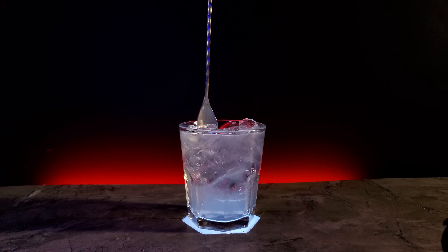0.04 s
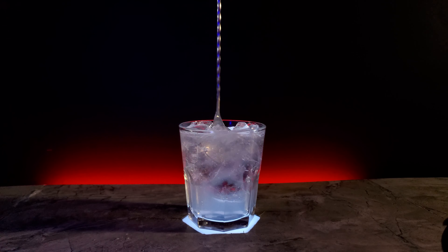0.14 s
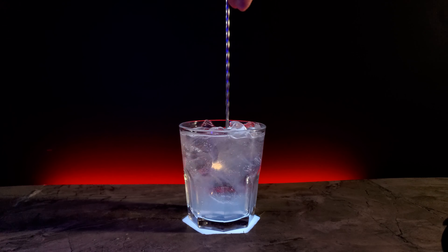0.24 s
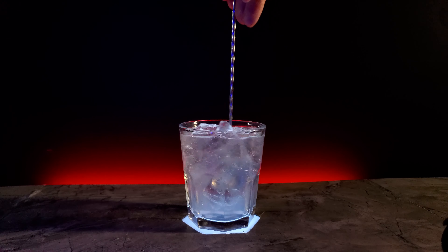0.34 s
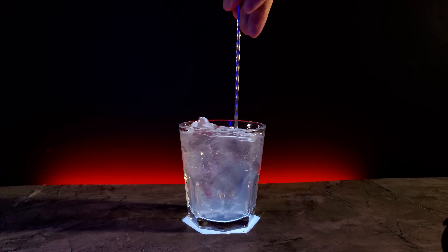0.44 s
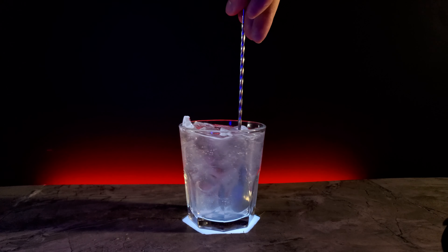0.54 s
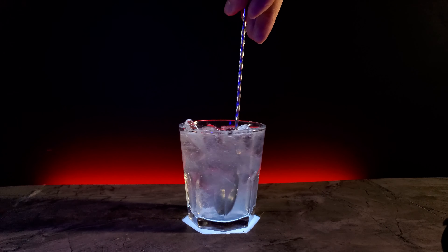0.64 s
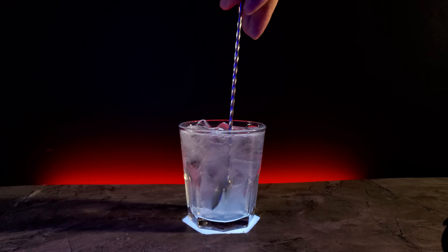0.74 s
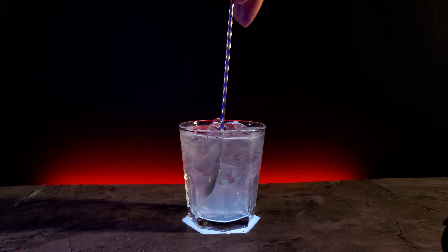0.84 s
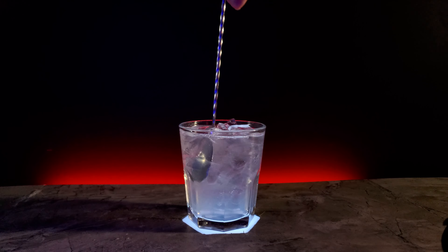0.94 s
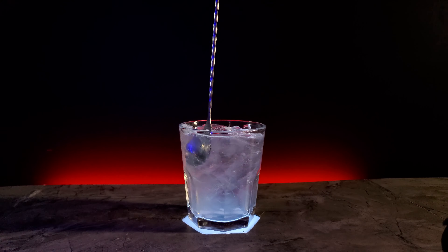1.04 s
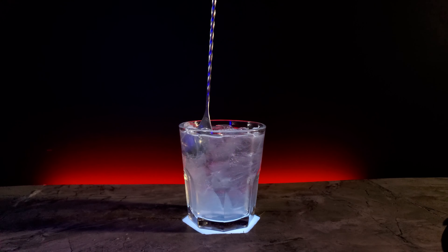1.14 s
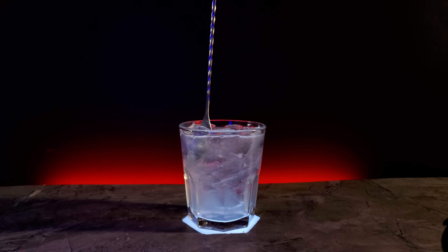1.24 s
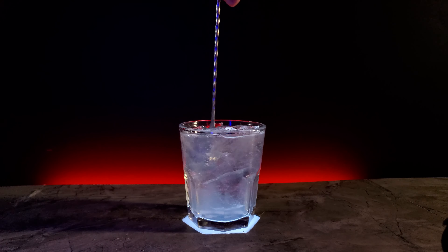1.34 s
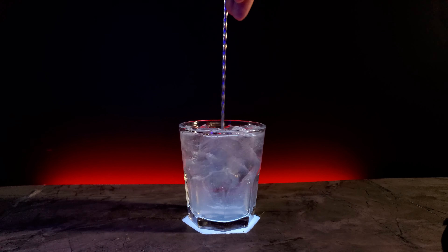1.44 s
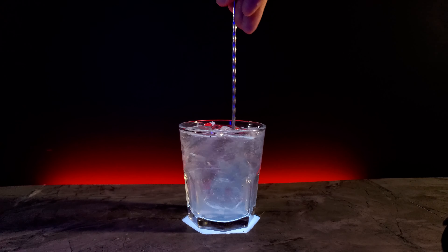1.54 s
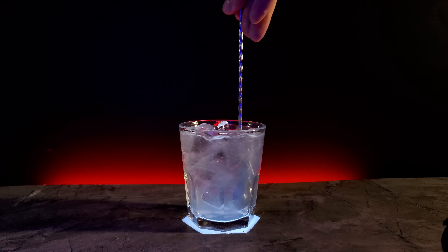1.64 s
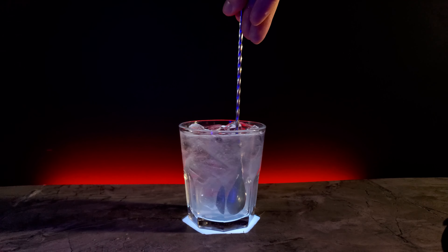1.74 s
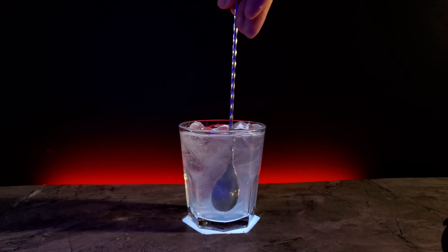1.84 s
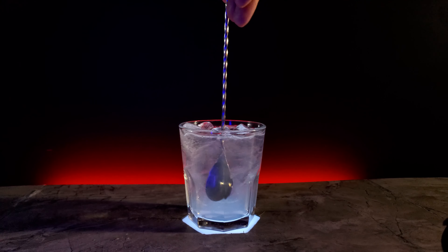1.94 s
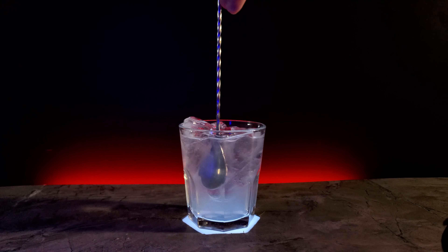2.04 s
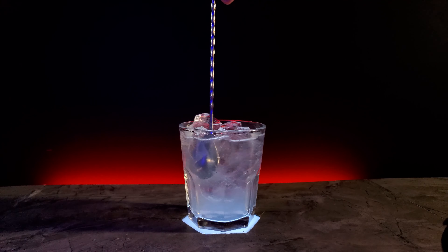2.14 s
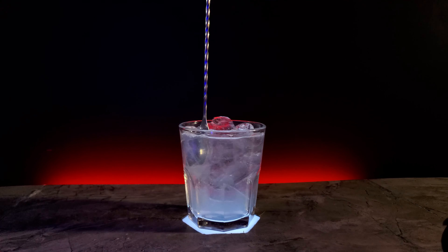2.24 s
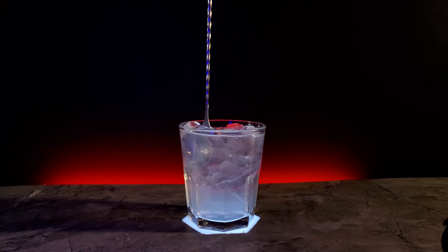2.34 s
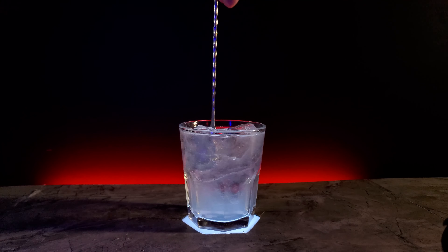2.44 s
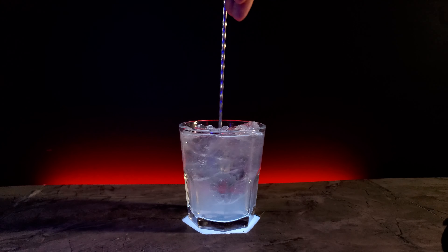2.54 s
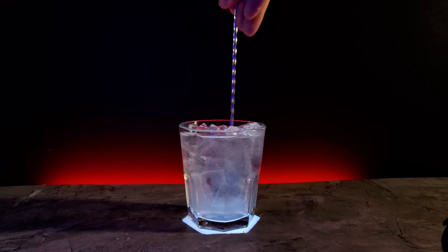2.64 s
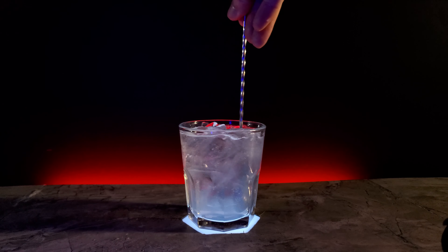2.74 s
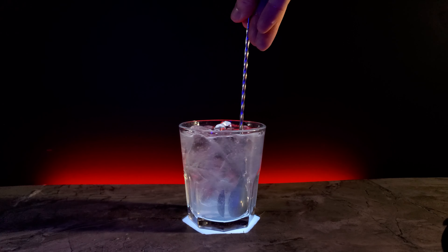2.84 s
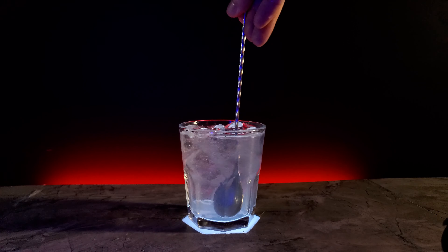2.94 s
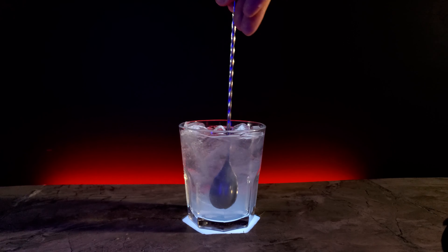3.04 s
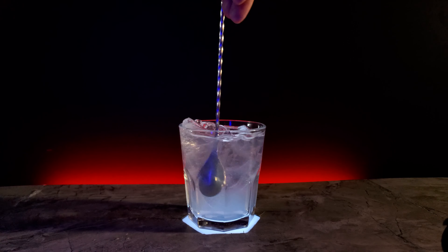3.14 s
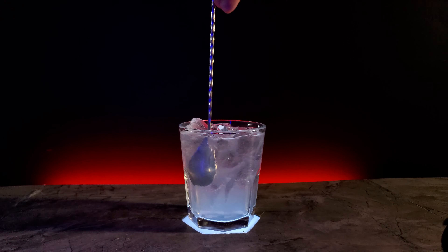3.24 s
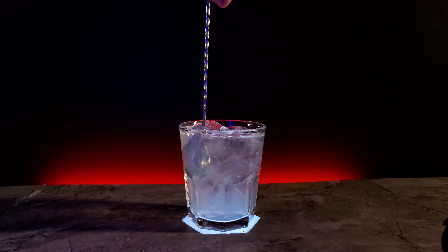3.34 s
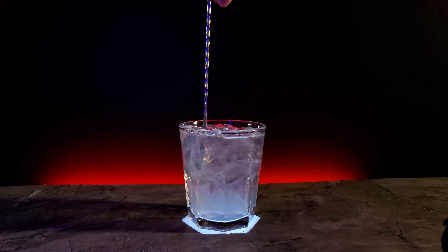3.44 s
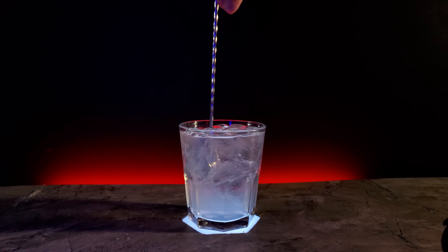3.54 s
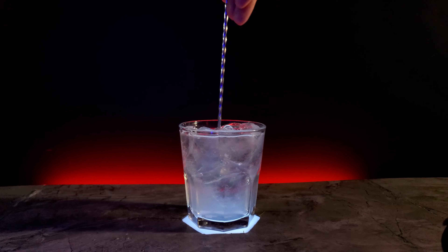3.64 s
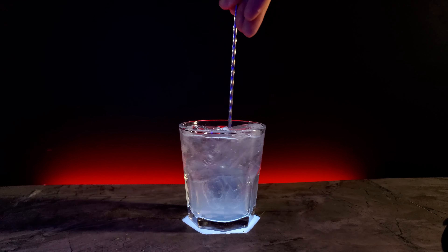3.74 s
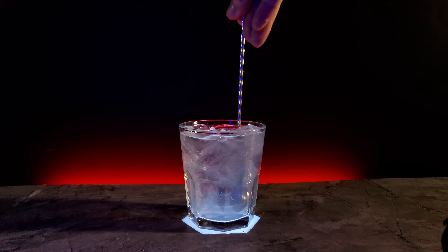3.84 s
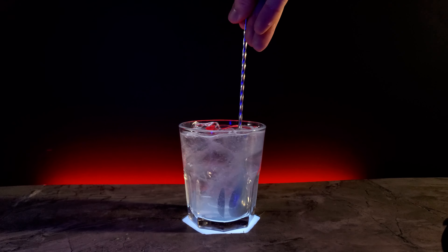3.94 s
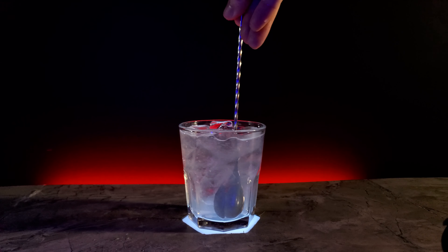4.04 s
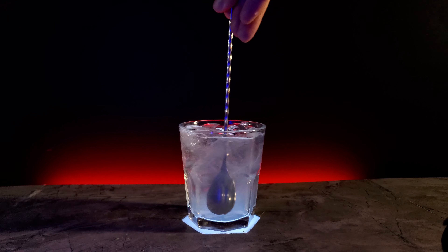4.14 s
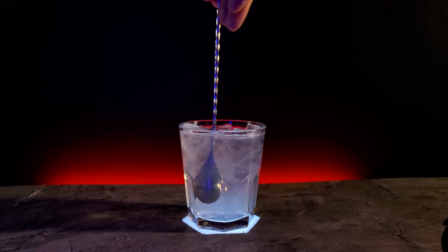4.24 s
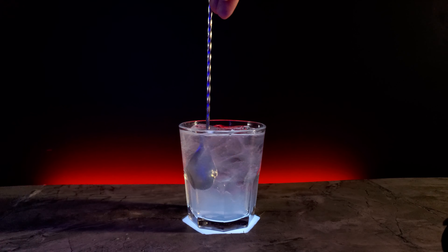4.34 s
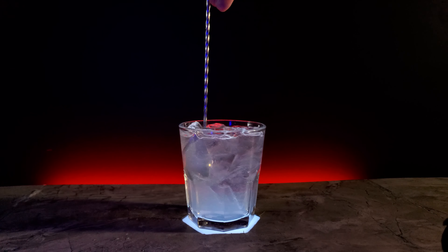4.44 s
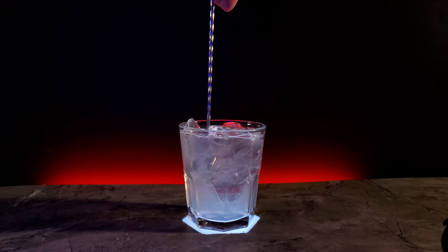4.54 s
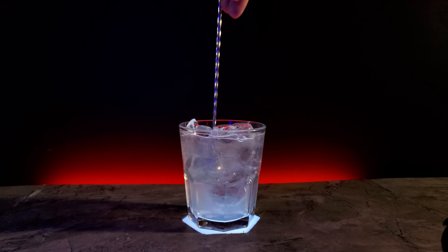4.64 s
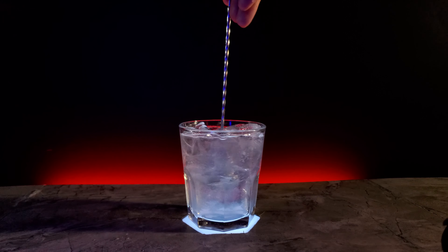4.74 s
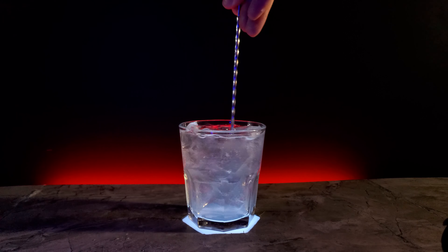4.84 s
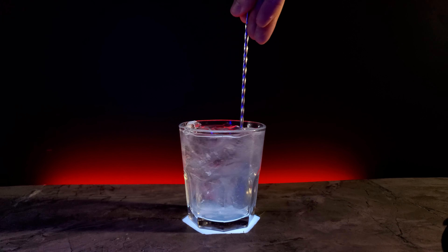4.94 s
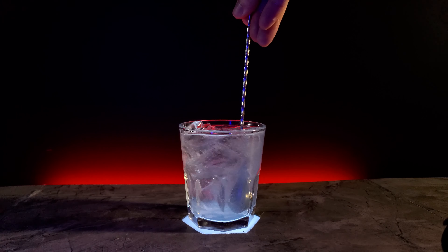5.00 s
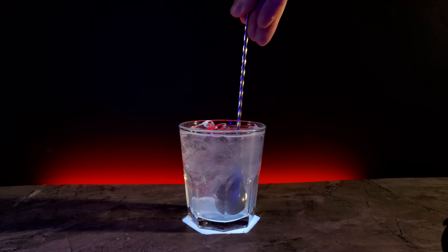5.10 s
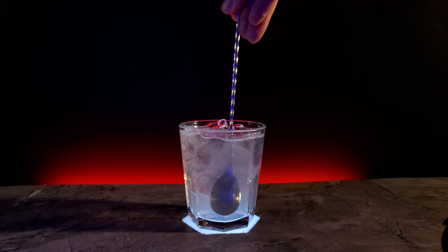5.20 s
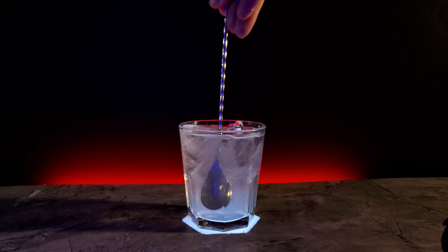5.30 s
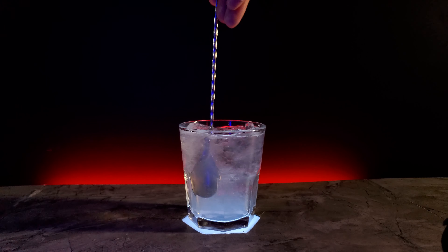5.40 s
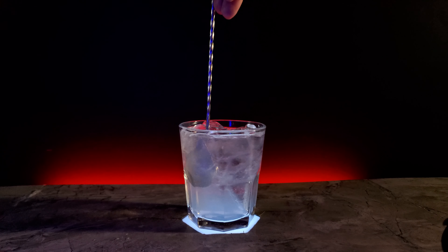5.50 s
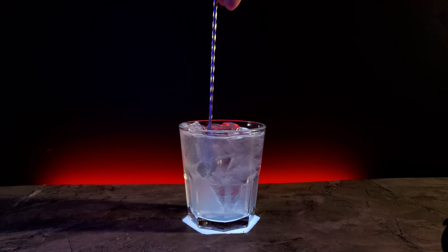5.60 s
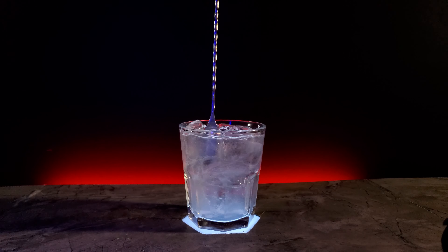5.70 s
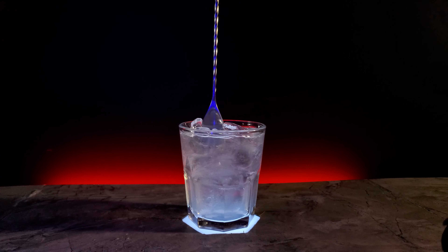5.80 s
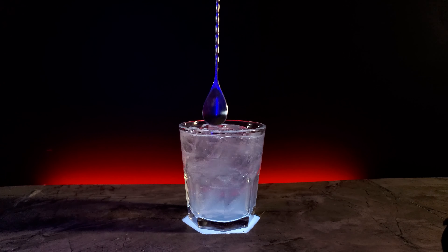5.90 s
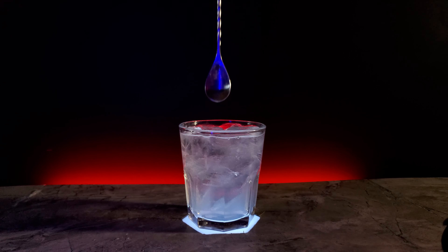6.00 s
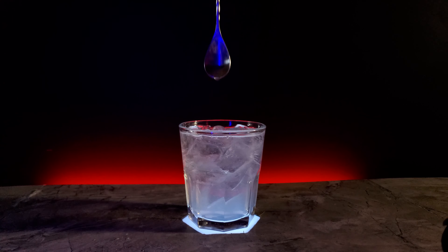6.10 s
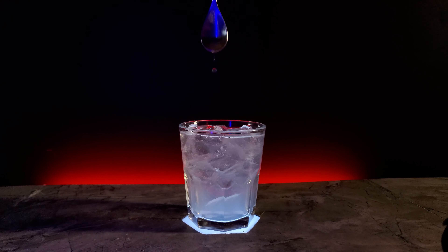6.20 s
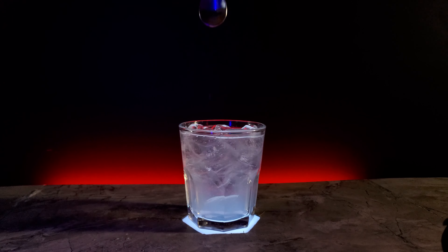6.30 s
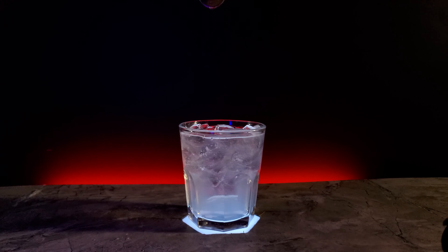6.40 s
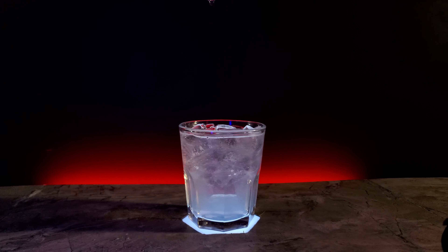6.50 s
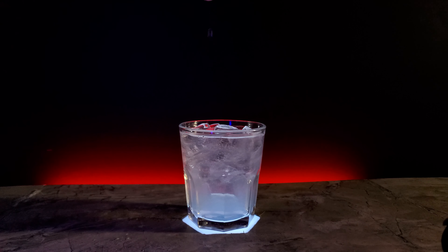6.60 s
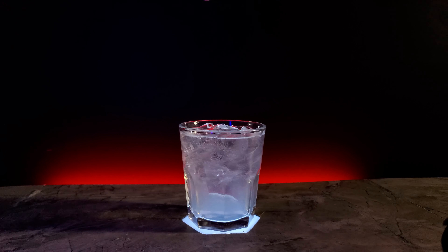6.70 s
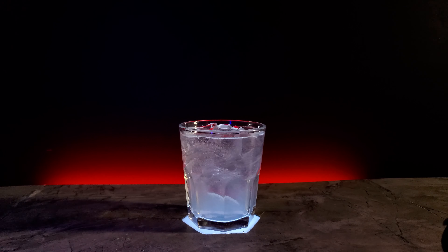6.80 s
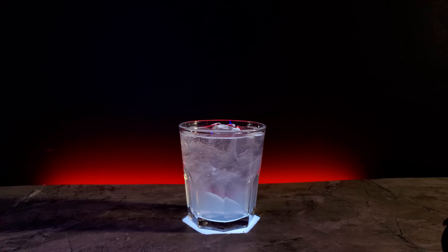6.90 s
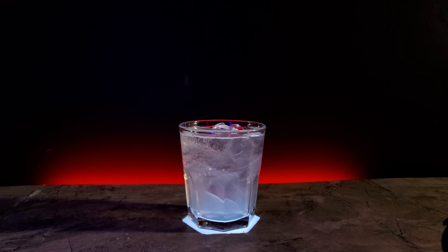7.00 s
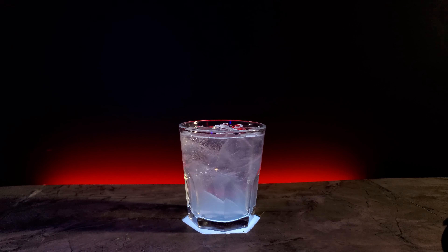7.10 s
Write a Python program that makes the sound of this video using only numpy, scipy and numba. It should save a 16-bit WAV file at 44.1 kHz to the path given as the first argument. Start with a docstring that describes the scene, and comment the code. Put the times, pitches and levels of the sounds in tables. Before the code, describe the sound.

Close-up of ice being stirred in a full glass: a bright opening burst of knocks, busy wet clinks and rattles, then settling into stillness.

```python
"""A quick clatter of knocks and watery plops opens: a long spoon drops into a thick tumbler of ice and water,
stirs it round and is lifted out, close to a stereo microphone. Contacts of cubes and spoon are impulses and
gritty noise that crack, then excite fading resonators for the wet glass; cube and spoon ring as decaying sines.
Air pockets are gliding sines, the table thuds as low noise, and a small quiet room answers over still air."""
import sys
import numpy as np
from scipy import signal
from scipy.fft import rfft, irfft
from scipy.io import wavfile
from scipy.ndimage import uniform_filter1d
from numba import njit

SR = 44100
rng = np.random.default_rng(int(sys.argv[2]) if len(sys.argv) > 2 else 0)


def voltage_ratio(decibels):
    """Convert decibels (scalar or array-like) to amplitude ratios, 20 dB per decade."""
    exponent = np.asarray(decibels, float) / 20
    return 10 ** exponent


def generate_wav(signal):
    """Clip the signal to [-1, 1] and save it as 16-bit WAV at the path in sys.argv[1]."""
    frames = np.transpose(np.atleast_2d(signal))
    scaled = np.clip(frames, -1, 1) * 32767
    pcm = np.round(scaled).astype(np.int16)
    wavfile.write(sys.argv[1], SR, pcm)


N = 315577


def knocks():
    """Impact spectrum: a knock with much body is dull and low, one with little is bright; each varies a little."""
    # clear knocks: t/s, strength level/dB, body (low ring against the whole)/dB
    knock_table = [(0.0381, -3.5, -10.5), (0.0506, 2.5, -17), (0.0666, 1, -14.5), (0.0942, -2, -15.5),
                   (0.1238, -12, -9), (0.171, -15, -21), (0.1885, -20, -14), (0.2094, -3.5, -19.5),
                   (0.2438, -18, -3.5), (0.2807, 1, -18.5), (0.3227, -6, -11), (0.3419, -9.5, -6),
                   (0.364, -16, -17), (0.4007, -22, -33), (0.4232, -18, -13), (0.4437, -22, -9),
                   (0.4574, -15, -10), (0.5823, -21, -6.5), (0.6233, -18, -16), (0.6802, -15.5, -9.5),
                   (0.7163, -19.5, -5.5), (0.7443, -31, -10), (0.8886, -27, -13), (0.915, -19.5, -11.5),
                   (0.9304, -17, -13.5), (0.9454, -14, -16.5), (1.0058, -18, -13), (1.0161, -13, -8),
                   (1.0303, -8.5, -18), (1.1037, -17.5, -29), (1.1526, -13, -14.5), (1.1737, -15.5, -23),
                   (1.2283, -22, -9), (1.2473, -6.5, -20.5), (1.2945, -39, -23), (1.3371, -3, -10),
                   (1.37, -16.5, -16.5), (1.4194, -21, -15), (1.4378, -19, -24), (1.4643, -25, -15),
                   (1.494, -21, -11), (1.506, -14, -13), (1.575, -23.5, -3), (1.6365, -21, -7.5),
                   (1.6919, -12, -12), (1.718, -3.5, -16.5), (1.7778, -22, -6), (1.8198, -51, -21),
                   (1.8397, -19.5, -17), (1.867, -19, -7.5), (1.9016, -18.5, -7.5), (1.9376, -15, -16),
                   (1.9748, -23.5, -4.5), (2.008, -20, -9.5), (2.0517, -21.5, -13), (2.0812, -16.5, -8.5),
                   (2.1082, -14, -9), (2.147, -17, -11), (2.164, -16.5, -20), (2.2476, -19.5, -9),
                   (2.3146, -15, -24.5), (2.3302, -20.5, -22), (2.3989, -28, -2), (2.4683, -38, -8),
                   (2.4847, -19, -9.5), (2.535, -14.5, -11), (2.59, -36, -17), (2.603, -13.5, -19.5),
                   (2.6551, -14, -9.5), (2.6889, -8.5, -19), (2.7307, -23.5, -5), (2.7416, -17.5, -7.5),
                   (2.7544, -9, -10), (2.7821, -21.5, -7), (2.81, -19, -18), (2.82, -19, -10),
                   (2.8499, -1.5, -17), (2.8986, -24, -22), (2.962, -23, -6.5), (2.9879, -16.5, -13.5),
                   (3.0098, -22, -18.5), (3.0625, -17, -17), (3.0822, -18, -8.5), (3.1115, -15.5, -11),
                   (3.1505, -18.5, -18), (3.1791, -19.5, -14), (3.2111, -15, -17), (3.2627, -12, -11.5),
                   (3.2848, -20, -10), (3.3218, -17, -16.5), (3.342, -22, -11), (3.3634, -12.5, -25),
                   (3.3855, -31, -10), (3.4031, -7.5, -14), (3.4577, -13, -20), (3.4957, -12.5, -29.5),
                   (3.6146, -24.5, -31), (3.662, -29.5, -6), (3.7591, -24, -11.5), (3.7866, -15, -7.5),
                   (3.8137, -19.5, -12.5), (3.8376, -16.5, -6), (3.9469, -29, -3.5), (3.9812, -15.5, -8),
                   (3.9973, -11.5, -15.5), (4.0706, -18.5, -23), (4.0837, -5, -16), (4.1006, -23, -6),
                   (4.116, -15, -12), (4.1392, -15, -16), (4.1597, -17, -11.5), (4.1888, -14.5, -11.5),
                   (4.22, -19, -15.5), (4.2482, -19, -9), (4.2989, -17.5, -11), (4.347, -28, -4),
                   (4.4366, -15, -15.5), (4.4817, -17, -19), (4.5722, -31, -18), (4.6127, -29.5, -4),
                   (4.6491, -20.5, -4.5), (4.7104, -12, -13), (4.7601, -18.5, -7), (4.779, -5, -8.5),
                   (4.8055, -7, -13), (4.8158, -8, -13.5), (4.8585, -17.5, -3.5), (4.8966, -11, -9.5),
                   (4.9822, 2, -17.5), (5.004, -15.5, -13), (5.0918, -24, -7), (5.1682, -24, -2),
                   (5.1898, -21, -3), (5.2016, -16.5, -9), (5.2372, -25.5, -3), (5.2812, -18.5, -19.5),
                   (5.3425, -19.5, -9), (5.3739, -7, -15.5), (5.4791, -15.5, -13.5), (5.4852, -27, -14),
                   (5.5132, -13, -21.5), (5.527, -18.5, -14.5), (5.5453, -24, -14), (5.5584, -15.5, -9.5),
                   (5.5686, -19, -16.5), (5.615, -8.5, -8), (5.6875, -30, -9), (5.7489, -4.5, -13.5),
                   (5.7765, -15, -12), (5.7977, -16, -10.5), (5.8327, -8, -14), (5.8627, -24, -15),
                   (5.874, -15.5, -17), (5.9494, -12.5, -13), (5.9627, -16, -11.5), (5.9759, -12, -20),
                   (6.0701, -24, -8), (6.0834, -24.5, -8.5), (6.117, -31, -17), (6.1993, -43, -20),
                   (6.2365, -33, -16), (6.2546, -22.5, -7), (6.3342, -28.5, -8), (6.4432, -35, -7),
                   (6.547, -50, -23), (6.649, -37.5, -8.5), (7.078, -46.5, -36)]
    # a middling knock, one level/dB for each band
    middling_band_db = [-9.5, -7, -6.5, -8.5]
    # change of each band per dB of body above a middling knock, dB/dB
    body_share = [0.99, 0.59, -0.56, -0.85]
    middling_body_db = -12.5
    s, strength_db, body_db = np.transpose(knock_table)[:, :, None]
    body_db = np.clip(body_db - middling_body_db, -13, 9)
    chance = rng.standard_normal((len(s), 5))
    band_db = strength_db + middling_band_db + body_db * body_share + 0.94 * chance[:, :4]
    cube_hz = 4000 * 2 ** (-0.11 * body_db[:, 0] + 0.26 * chance[:, 4])
    return s[:, 0], band_db, np.clip(cube_hz, 1200, 12000)


def drift(count, size):
    """Moving average of white noise: unrelated walks of spread 1, one value per 64 samples, smooth over size."""
    return np.sqrt(size) * uniform_filter1d(rng.standard_normal((count, N // 64 + 1)), size)


def jostle(level_db, count=3400):
    """Random point process: cubes bump each other and the wall hundreds of times a second, mostly softly."""
    # small knocks, one level/dB for each band
    small_band_db = [-7.5, -9.5, -6.5, -8]
    plunge_s = 0.031
    s = rng.uniform(plunge_s, N / SR, count)
    chance = rng.standard_normal((count, 6))
    # louder bumps come in bunches
    level_db = level_db + 2.6 * np.repeat(drift(count=1, size=16)[0], 64)[:N]
    size_db = level_db[(s * SR).astype(int)] + 7.37 * np.clip(chance[:, 0], -3, 1.25) + 3.5
    band_db = size_db[:, None] + np.array(small_band_db) + 2.4 * np.clip(chance[:, 1:5], -3, 1.5)
    cube_hz = 4200 * 2 ** (0.4 * chance[:, 5])
    return s, band_db, np.clip(cube_hz, 1200, 12000)


def taps(s, band_db):
    """Impulsive excitation: one impulse per contact in each band."""
    return np.array([np.bincount((s * SR).astype(int), voltage_ratio(db), N) for db in band_db.T])


def fade(x, tau):
    """Exponential relaxation: every impulse dies away with time constant tau in seconds."""
    return signal.lfilter([1], [1, -np.exp(-1 / (tau * SR))], x)


def push(impulses, rise_s, crunch_s, skid_s, skid_db):
    """Contact force envelope: the grit rises quickly, crunches, and leaves a longer weaker skid."""
    # the skid weakens by 2 dB from band to band upward
    skid_gain = voltage_ratio(skid_db - 2 * np.arange(len(impulses))[:, None])
    force = fade(impulses, crunch_s) + skid_gain * fade(impulses, skid_s)
    return fade(force, rise_s) / (1 + rise_s * SR)


def stereo(x, alike):
    """Interchannel coherence: two unrelated signals give left and right; alike is the share in common."""
    alike = np.clip(alike, 0, 1)
    return np.sqrt(alike) * x[0] + np.sqrt(1 - alike) * x[1] * np.array([[1], [-1]])


@njit
def modes(x, hz, t60, gain, wander, sr):
    """Modal synthesis: x strikes fading resonators whose pitch follows wander, decay t60 and drive gain."""
    out = np.zeros(x.shape)
    for k in range(len(hz)):
        for c in range(2):
            z, p = 0j, 0j
            for i in range(x.shape[1]):
                if i % 64 == 0:
                    turn = 2j * np.pi * hz[k] * wander[k, i // 64] / sr
                    loss = np.log(1000) / (t60[k, i // 64] * sr)
                    p = np.exp(turn - loss)
                z = z * p + gain[k, i // 64] * x[c, i] + 1e-18
                out[c, i] += z.imag
    return out


def glass(blow, strength, ring_db, table_db):
    """Forced and free vibration: contact grit is heard bare; grit and clean blows ring the wall's modes."""
    # modes of the water-filled glass before they wander: f/Hz, level/dB, t60/s
    glass_modes = [(367.3, -13.5, 0.033), (645, -7, 0.02), (1492, -9, 0.086), (1558, 4, 0.041),
                   (1695, 3.5, 0.011), (3020, 1, 0.031), (5218, 13.5, 0.003), (5805, 2.5, 0.0051),
                   (9140, 4.5, 0.0037), (10360, 6, 0.0025)]
    # limits of the four contact bands: f/Hz
    band_limits = [1000, 2200, 3800, 7200, 13500]
    # the bare contact beside the ring, one level/dB for each band
    crack_db = [-38.5, 2.5, -6, -3.5]
    # share common to both sides, one for each band
    band_alike = [0.99, 0.94, 0.96, 0.73]
    hz, db, t60 = np.transpose(glass_modes)
    low = hz < band_limits[0]
    t = np.arange(N // 64 + 1) * 64 / SR

    # ice leaning on the wall pulls every mode about and now damps it, now lets it ring
    wander = 1 + np.where(low, 0.1, 0.021)[:, None] * drift(len(hz), size=16)
    # with the spoon out the ice settles and the wall rings longer: e-folds of decay time gained
    lift_s, settle_s, freed = 6.1, 0.25, 0.55
    freedom = freed * np.clip((t - lift_s) / settle_s, 0, 1)
    t60 = t60[:, None] * np.exp(0.27 * drift(len(hz), size=40) + freedom)
    # air carried down by the plunge flattens and weakens the ring, then clears
    froth_sag, froth_db, froth_s = 0.045, -4.5, 0.76
    froth = np.exp(-(t / froth_s) ** 2)
    wander = wander - froth_sag * froth
    # the spot that is hit moves round, favouring other modes
    gain = voltage_ratio(db[:, None] + ring_db + froth_db * froth + 3.6 * drift(len(hz), size=12))
    # the lowest modes speak when the glass presses on the table: dB per dB of table level
    thump_db, thump_follows = 52.5, 0.52
    gain[low] *= voltage_ratio(thump_follows * (table_db[::64] + thump_db))

    grit = rng.standard_normal((2, N))
    out = 0
    for k, (lo, hi) in enumerate(zip(band_limits, band_limits[1:])):
        force = stereo(grit * strength[k], band_alike[k])
        band = signal.butter(3, [lo, hi], "band", fs=SR, output="sos")
        crack = signal.sosfilt(band, force) * np.sqrt(SR / 2 / (hi - lo))
        # each blow lands a little to one side or the other
        force = force + stereo(blow[k] * np.sign(grit), band_alike[k])
        out = out + voltage_ratio(crack_db[k]) * crack
        groups = [(hz >= lo) & (hz < hi)]
        if k == 0:  # the lowest band also drives the modes below it
            groups.append(low)
        for mine in groups:
            ring = modes(force, hz[mine], t60[mine], gain[mine], wander[mine], SR)
            # a mode sheds little sound far below its own pitch
            radiation = signal.butter(3, 0.63 * hz[mine].min(), "high", fs=SR, output="sos")
            out = out + signal.sosfilt(radiation, ring)
    # the highest treble of the glass falls away gently
    out = signal.sosfilt(signal.butter(3, 12600, fs=SR, output="sos"), out)
    # the small wall moves little air at the lowest frequencies
    return signal.sosfilt(signal.butter(3, 420, "high", fs=SR, output="sos"), out)


def cubes(s, band_db, hz):
    """Free vibration: every contact rings the cube briefly, at a pitch of its own and from its own side."""
    ring_db, cycles = -12.5, 56  # level beside the contact; cycles to fade 60 dB, before the closing taper
    t = np.arange(512) / SR
    level_db = band_db.max(axis=1)[:, None] + ring_db - 60 * t * hz[:, None] / cycles
    ring = voltage_ratio(level_db) * np.sin(2 * np.pi * hz[:, None] * t)
    # soft onset, and a taper to silence
    ring = ring * (1 - np.exp(-t / 0.00053)) * np.cos(np.pi / 2 * t / t[-1])
    at = ((s * SR).astype(int)[:, None] + np.arange(len(t))).ravel()
    pan_db = 2.0 * rng.standard_normal((len(s), 1))
    sides = [(ring * voltage_ratio(side * pan_db)).ravel() for side in (-1, 1)]
    return np.array([np.bincount(at, x, N + len(t))[:N] for x in sides])


def spoon():
    """Selective modal excitation: a clink rings the bowl, most in modes near the pitch its spot favours."""
    # modes of the spoon's bowl: f/Hz, level/dB, t60/s
    bowl_modes = [(2840, -8.5, 0.057), (4230, 0, 0.066), (4700, -3, 0.055), (5260, 5.5, 0.023)]
    # clinks on the wall: t/s, level/dB, favoured f/Hz
    clinks = [(0.2126, -21, 5300), (1.7181, -20, 5020), (2.8498, -14.5, 5030), (4.984, -11, 3450)]
    favour_db_per_octave = 29.5
    t = np.arange(int(0.15 * SR)) / SR
    out = np.zeros(N)
    hz, mode_db, t60 = np.transpose(bowl_modes)[:, :, None]
    for s, db, spot_hz in clinks:
        own_db = -favour_db_per_octave * np.abs(np.log2(hz / spot_hz))
        ring = voltage_ratio(db + mode_db + own_db - 60 * t / t60) * np.sin(2 * np.pi * hz * t)
        start = int(s * SR)
        out[start:start + len(t)] += ring.sum(axis=0)
    return out


def plops():
    """Bubble resonance: each air pocket rings as a decaying sine and slides in pitch."""
    # pockets squeezed between the cubes as the spoon goes in:
    # t/s, starting f/Hz, level/dB, t60/s, starting rise/(octave/s)
    pockets = [(0.034, 366, -31, 0.16, -1.5), (.095, 840, -23.5, 0.11, -0.5),
               (.125, 910, -23.5, 0.034, -20), (.158, 944, -31, 0.3, -1.5), (.255, 847, -29, 0.15, -3),
               (.318, 1073, -27, 0.19, 13.5)]
    s, hz, db, t60, rise = np.transpose(pockets)[:, :, None]
    t = np.clip(np.arange(SR) / SR - s, 0, t60)
    envelope = voltage_ratio(db - 60 * t / t60) * (1 - np.exp(-t / 0.00072))
    cycles = hz * t * (1 + np.log(2) * rise * t / 2)
    x = envelope * np.sin(2 * np.pi * cycles)
    return np.pad((x * (t < t60)).sum(axis=0), (0, N - SR))


def shoves(jostle_db):
    """Addition of powers: table level in dB, a swell per shove over a rumble that follows the stirring."""
    # shoves of the glass against the table: t/s, level/dB, length/s (from the peak to 1/e of its power)
    shove_table = [(0.094, -43.5, 0.054), (0.31, -50.5, 0.047), (0.484, -51.5, 0.019), (1.041, -46.5, 0.02),
                   (1.72, -46, 0.076), (2.746, -46, 0.13), (3.864, -43, 0.084), (4.824, -50, 0.023),
                   (4.97, -41.5, 0.054)]
    rumble_db, rumble_follows = -44.5, 0.28  # level at 0 dB of jostle; dB gained per dB of jostle
    t = np.arange(N) / SR
    power = sum(voltage_ratio(db) ** 2 * np.exp(-((t - s) / length) ** 2) for s, db, length in shove_table)
    return 10 * np.log10(power + voltage_ratio(rumble_db + rumble_follows * jostle_db) ** 2)


def coloured(points, alike):
    """Spectral shaping: stereo noise of rms 1 through the relative spectrum f/Hz, level/dB."""
    hz, db = np.transpose(points)
    bin_hz = np.arange(1, N // 2 + 2) * SR / N
    gain = voltage_ratio(np.interp(np.log(bin_hz), np.log(hz), db))
    noise = irfft(rfft(rng.standard_normal((2, N))) * gain, N)
    x = stereo(noise, alike)
    return x / x.std()


def thud(level_db):
    """Low plate resonance: the table top rumbles at its low mode, in jolts, as the glass is pushed about."""
    jolt = uniform_filter1d(drift(count=1, size=24), size=12)[0]
    jolt_db = 3.2 * np.repeat(jolt, 64)[:N]
    # relative spectrum: f/Hz, level/dB
    spectrum = [(25, -37.0), (45, 1.0), (72, 5.0), (105, 1), (160, -14.0), (600, -24.5), (1100, -43)]
    return voltage_ratio(level_db + jolt_db) * coloured(spectrum, alike=0.75)


def room(x, t60, wet_db):
    """Diffuse reverberation: a short, dull, exponentially fading tail, different at each side."""
    t = np.arange(int(0.4 * SR)) / SR
    tail = rng.standard_normal((2, len(t))) * voltage_ratio(-60 * t / t60) * (t > 0.003)
    tail = signal.sosfilt(signal.butter(1, 4500, fs=SR, output="sos"), tail)
    tail = tail / np.sqrt(np.sum(tail ** 2) / 2)
    return x + voltage_ratio(wet_db) * signal.fftconvolve(x, tail, axes=1)[:, :N]


def air():
    """Stationary background noise: still air as steady coloured noise."""
    # relative spectrum of the air: f/Hz, level/dB
    air_spectrum = [(25, -36.5), (150, -7.5), (259, -19.5), (296, -14), (358, -25.5), (8000, -38),
                    (12000, -34.5), (16500, -36)]
    return voltage_ratio(-65) * coloured(air_spectrum, alike=0.6)


def scene():
    """Superposition: contacts and plops sound in the room, over thuds and still air."""
    # the stirring: t/s, jostle level of the cubes/dB
    stirring = [(0.03, -28.5), (0.3, -23), (0.41, -37), (0.478, -26), (0.6, -43), (0.78, -44.5),
                (1.05, -37), (1.65, -38), (2.45, -41), (2.7, -35), (3.0, -49.5), (3.4, -36), (3.75, -44.5),
                (4.1, -42.5), (4.5, -43.5), (4.8, -40), (5.15, -49.5), (5.85, -38.5), (6.2, -58),
                (6.7, -72), (7.15, -101)]
    jostle_db = np.interp(np.arange(N) / SR, *np.transpose(stirring))
    table_db = shoves(jostle_db)
    clear, soft = knocks(), jostle(jostle_db)
    hard = taps(*clear[:2])
    grit = voltage_ratio(-6.5) * push(hard, rise_s=0.00047, crunch_s=0.0005, skid_s=0.0075, skid_db=-14.5)
    # wet ice on ice meets more gently and slides
    grit = grit + push(taps(*soft[:2]), rise_s=0.0011, crunch_s=0.00038, skid_s=0.0085, skid_db=-28.5)
    near = glass(voltage_ratio(4.5) * hard, grit, ring_db=-19.5, table_db=table_db) + plops() + spoon()
    near = near + cubes(*clear) + cubes(*soft)
    dry = room(near, t60=0.23, wet_db=-13.5) + thud(table_db) + air()
    # the glass stands a little to the right: left and right gain in dB
    return dry * voltage_ratio([[-0.45], [0.45]])


def roll_off(x):
    """The treble ends steeply here."""
    return signal.sosfilt(signal.butter(12, 16810, fs=SR, output="sos"), x)


def record(dry):
    """Low-pass filtering: the recorder cuts the top steeply above 16 kHz."""
    finished = signal.sosfilt(signal.butter(16, 16000, fs=SR, output="sos"), dry)
    return roll_off(finished)


dry = scene()
out = record(dry)
generate_wav(out)
```